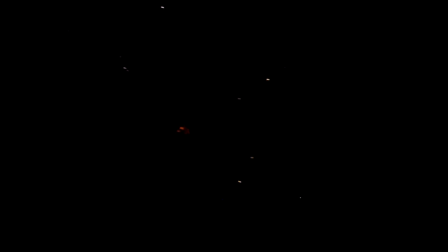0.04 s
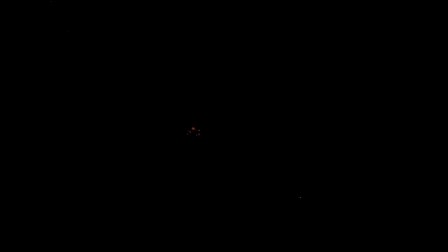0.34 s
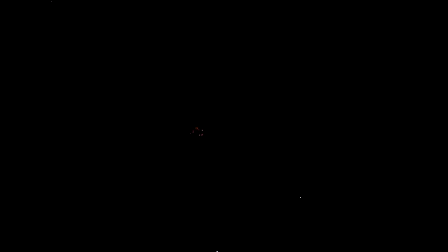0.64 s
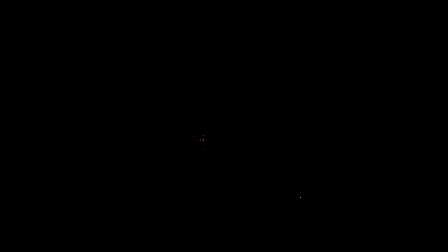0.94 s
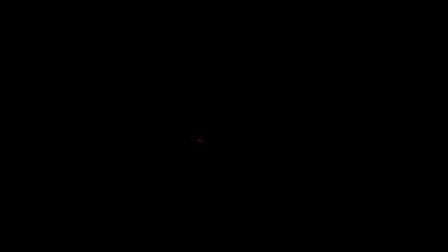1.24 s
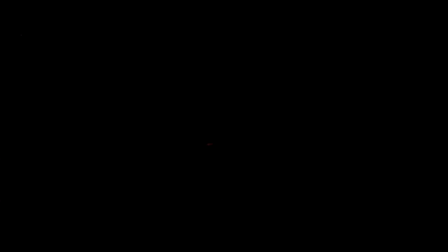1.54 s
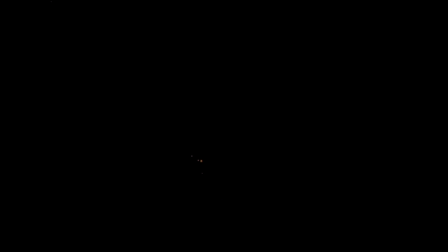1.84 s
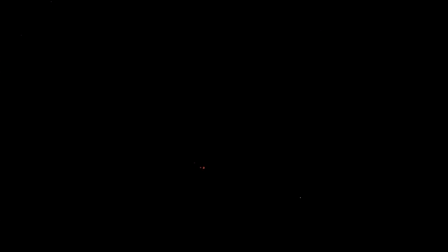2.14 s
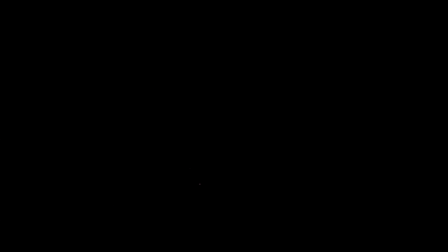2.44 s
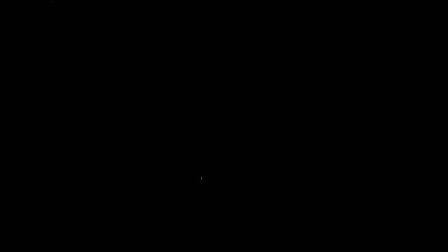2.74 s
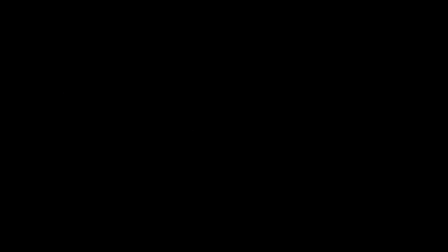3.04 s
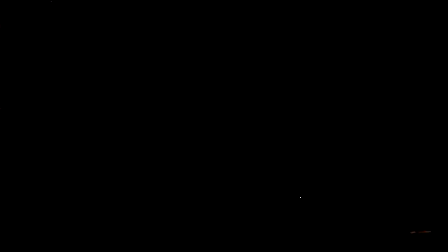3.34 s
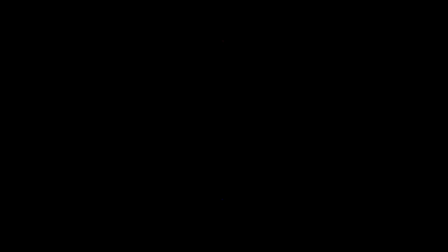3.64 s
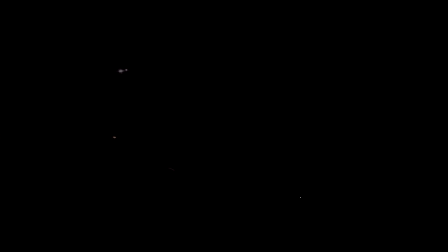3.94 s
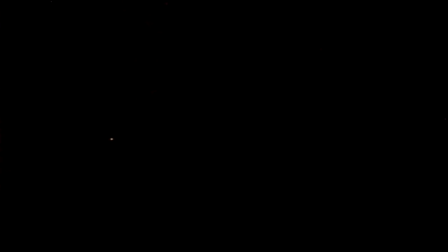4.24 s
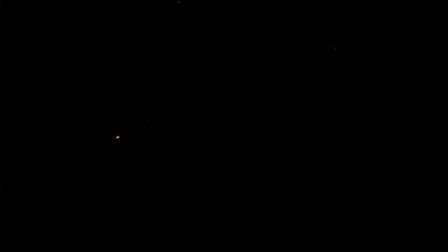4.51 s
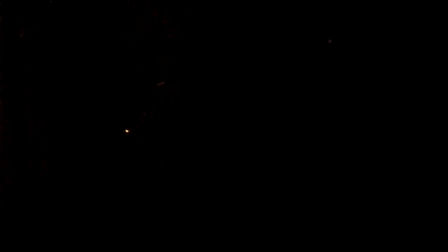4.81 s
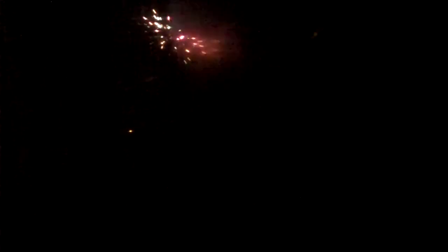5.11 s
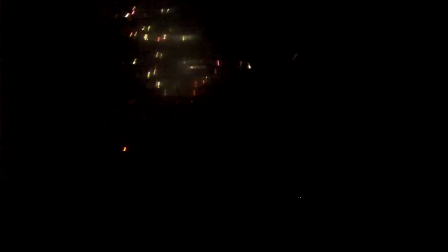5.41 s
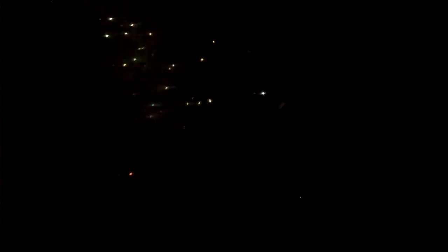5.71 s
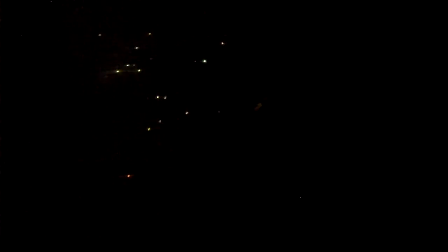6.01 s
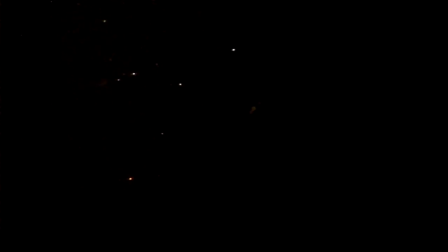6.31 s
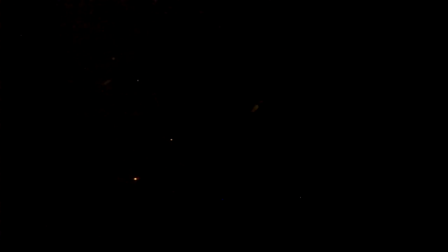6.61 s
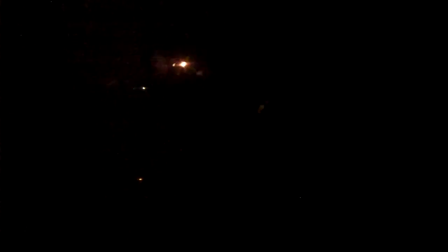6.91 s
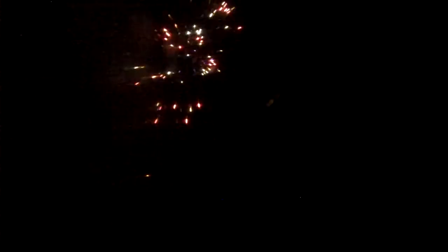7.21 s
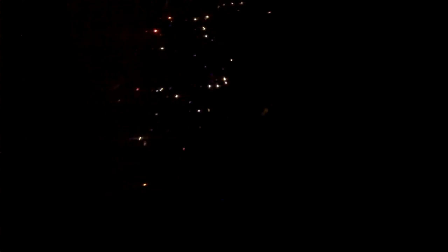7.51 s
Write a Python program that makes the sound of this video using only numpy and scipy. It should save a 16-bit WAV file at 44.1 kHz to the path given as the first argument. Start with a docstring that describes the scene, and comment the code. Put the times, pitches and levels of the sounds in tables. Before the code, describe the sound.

Fireworks go off at night, heard from between houses. Dull launch thuds roll in from a distance and a small cracker snaps brightly. A very loud, dry double crack follows, overloading the small microphone. Then shells burst overhead, first in quick succession, then louder and farther apart, each echoing off the house fronts. Faint far pops and barely audible rocket whistles sit over a quiet rumble and hiss.

```python
"""Fireworks at night, heard from between houses: dull thuds farther off, then sharp bursts overhead.
Each bang is a jump in air pressure that rebounds from the ground, bounces between house fronts and
rolls away over the neighbourhood. A small cracker snaps and faint rockets whistle in the distance,
over a low rumble and hiss. The loudest bangs overload the small microphone."""
import sys
import numpy as np
from scipy import signal
from scipy.fft import rfft, irfft, next_fast_len
from scipy.io import wavfile

SR = 44100
rng = np.random.default_rng(int(sys.argv[2]) if len(sys.argv) > 2 else 0)


def dump_mix(stems):
    """Bounce the given channels to the path in sys.argv[1] as a 16-bit WAV at rate SR."""
    frames = np.atleast_2d(stems).T  # one column per channel
    limited = np.clip(frames, -1, 1)  # hard clip at full scale
    pcm = np.round(limited * 32767).astype(np.int16)
    wavfile.write(sys.argv[1], SR, pcm)


N = 333396


def from_db(db):
    """Turn decibels into a multiplier: 0 dB gives 1, -20 dB gives 0.1."""
    return 10 ** (np.asarray(db) / 20)


def unit_level(x):
    """Scale a sound so that its average level (rms) is 1."""
    return x / np.sqrt(np.mean(x ** 2) + 1e-20)


def keep_band(x, hz, kind, order=2):
    """Keep what is below hz ("low"), above it ("high") or between two values ("band")."""
    sections = signal.butter(order, np.clip(hz, 10, .45 * SR), kind, fs=SR, output="sos")
    return signal.sosfilt(sections, x + 1e-18)


def resonate(x, hz, width_hz):
    """Make a sound ring at one pitch; a narrower width rings longer."""
    r = np.exp(-np.pi * width_hz / SR)
    feedback = [1, -2 * r * np.cos(2 * np.pi * hz / SR), r * r]
    return signal.lfilter(np.array([1, 0, -1]) * (1 - r * r) / 2, feedback, x + 1e-18)


def add(out, start_s, x):
    """Mix x into out from start_s on."""
    i = int(np.clip(round(start_s * SR), 0, len(out)))
    out[i:i + len(x)] += x[:len(out) - i]


def coloured_noise(spectrum):
    """Steady noise with the given balance of low and high pitches."""
    hz, db = np.transpose(spectrum)
    size = next_fast_len(N)
    all_hz = np.fft.rfftfreq(size, 1 / SR)
    gain = from_db(np.interp(np.log(all_hz + 1), np.log(hz), db))
    return unit_level(irfft(rfft(rng.standard_normal(size)) * gain, size)[:N])


# How loud the rumble is over time: time_s, level_db
RUMBLE_LEVELS = [(0, -68), (.75, -68), (2.0, -56.5), (3.9, -61.5), (4.6, -61.5), (7.56, -64)]
# Its balance of low and high: pitch_hz, gain_db
RUMBLE_COLOUR = [(40, -19), (100, -3.5), (200, -5.5), (400, -2.5), (650, 2.5), (1000, -3.5), (1600, -14.5),
                 (3000, -26.5), (8000, -46.5)]
def town_rumble():
    """The town and far displays blur into a rumble that slowly rises and falls."""
    time_s, level_db = np.transpose(RUMBLE_LEVELS)
    return from_db(np.interp(np.arange(N) / SR, time_s, level_db)) * coloured_noise(RUMBLE_COLOUR)


# The hiss's balance of low and high: pitch_hz, gain_db
HISS_COLOUR = [(300, -0.5), (1500, 7), (3000, 8), (6000, 2), (9000, 0.5), (12000, 0), (13500, 0),
               (14500, -37.5)]
def faint_hiss(level_db=-73, fade_in_s=2.14, dip_s=3.27, recovery_s=0.6):
    """A hiss fades in, and dips briefly just after the loudest bang."""
    t = np.arange(N) / SR
    fade_db = -17.5 * (1 - np.minimum(t / fade_in_s, 1) ** 2)
    dip_db = -5 * (t > dip_s) * np.exp(-np.abs(t - dip_s) / recovery_s)
    return from_db(level_db + fade_db + dip_db) * coloured_noise(HISS_COLOUR)


# Soft low swells, puffs of air plus a thump at 3.29 s just after the loudest bang: peak_time_s, level_db,
# half_length_s
LOW_SWELLS = [(1.978, -49.5, 0.24), (3.29, -58, 0.075), (3.835, -50, 0.16), (5.8, -59, .14)]
def breeze(still_db=-70.5, cutoff_hz=10):
    """Slow air pushes on the microphone in soft puffs, and a low thump follows just after the loudest bang."""
    t = np.arange(N) / SR
    puffs = sum(from_db(db) * np.exp(-((t - peak_s) / half_s) ** 2) for peak_s, db, half_s in LOW_SWELLS)
    pressure = unit_level(keep_band(rng.standard_normal(N), cutoff_hz, "low"))
    return (from_db(still_db) + puffs) * pressure


# Pitches that the microphone's case boosts or weakens: pitch_hz, width_hz, gain_db
MIC_RESONANCES = [(201, 7.5, 4), (224, 61, -3.5), (280, 100, 3), (477, 12, 1), (554, 130, 1.5),
                  (671, 160, 3.5), (1203, 200, -1.5), (1400, 300, 2), (1940, 210, -2.5), (2740, 550, -3.5),
                  (4500, 1900, -3.5), (7500, 1000, 3.5)]
def blast_wave(pitch_hz, treble_hz, ring_db, ring_hz=3250, ring_width_hz=600):
    """A pressure jump, then suction. Bigger charges are deeper; air dulls what lies above treble_hz."""
    wave = resonate(signal.unit_impulse(2048), pitch_hz, width_hz=0.56 * pitch_hz)
    wave = keep_band(wave, treble_hz, "low")
    wave = keep_band(wave, 2.49 * treble_hz, "low", order=4)
    wave = keep_band(wave, 180, "high")   # the small microphone loses the bass and adds its own ring
    for hz, width_hz, gain_db in [*MIC_RESONANCES, (ring_hz, ring_width_hz, ring_db)]:
        wave = wave + (from_db(gain_db) - 1) * resonate(wave, hz, width_hz)
    return wave / np.abs(wave).max()


def echo_swarm(wave, t, per_s):
    """Many surfaces send the wave back at random times, a few as strong slaps."""
    arrivals = (rng.random(len(t)) < per_s / SR) * rng.choice([-1, 1], len(t))
    sizes = from_db(5 * np.minimum(rng.exponential(1, len(t)), 3))
    return unit_level(signal.oaconvolve(arrivals * sizes, wave)[:len(t)])


# Rebounds from the ground and roof edges: delay_s, gain_db (added to scatter_db)
REBOUNDS = [(.0038, -5.5), (0.028, -11.5)]
def crack(wave, scatter_db, front_db, fade_s=0.079, round_trip_s=.0387, trip_gain_db=-13.5):
    """The wave itself, its close echoes (scatter_db) and its bounces between house fronts (front_db)."""
    t = np.arange(SR // 4) / SR
    out = np.zeros(len(t))
    fade = from_db(-60 * t / fade_s)
    add(out, 0, wave)
    add(out, .002, from_db(scatter_db - 4) * fade * echo_swarm(wave, t, per_s=4300))
    for delay_s, gain_db in REBOUNDS:
        add(out, delay_s, from_db(scatter_db + gain_db) * wave)
    echo = from_db(-20) * fade * echo_swarm(wave, t, per_s=13000)
    add(echo, 0, wave)
    for trip in range(2):
        echo = keep_band(echo, 2300, "low")   # duller with every trip
        add(out, (trip + 1) * round_trip_s, from_db(front_db + trip * trip_gain_db) * echo)
    return out


# Walls around the listener: delay_s, gain_db
NEAR_WALLS = [(.0052, -19), (0.0128, -13.5), (0.0165, -11)]
def off_nearby_walls(wave):
    """Echoes bounce once more near the listener, which boosts some pitches and weakens others."""
    out = wave.copy()
    for delay_s, gain_db in NEAR_WALLS:
        add(out, delay_s, from_db(gain_db) * wave)
    return out


# Where one band of the street's echo ends and the next begins: pitch_hz
STREET_SPLITS = [350, 1000, 2200, 4500]
# Those bands, from bass to treble: fade_s (time to fall 60 dB), gain_db
STREET_BANDS = [(0.89, 5), (0.83, -0.5), (0.72, 4), (0.73, 3.5), (.42, 3)]
def street_tail(wave, swell_s=.016):
    """Dense echoes from the nearest buildings; the treble dies first."""
    t = np.arange(SR) / SR
    rest, bands = echo_swarm(wave, t, per_s=2400), []
    for hz in STREET_SPLITS:
        bands.append(keep_band(keep_band(rest, hz, "low"), hz, "low"))
        rest = keep_band(keep_band(rest, hz, "high"), hz, "high")
    swell = 1 - np.exp(-t / swell_s)
    fades = [from_db(gain_db - 60 * t / fade_s) for fade_s, gain_db in STREET_BANDS]
    return swell * sum(band * fade for band, fade in zip([*bands, rest], fades))


def far_roll(wave, length_s=2.1, swell_s=.05, fade_s=2.25, treble_hz=2300):
    """Duller echoes set in late, swell and roll away over the neighbourhood."""
    t = np.arange(int(length_s * SR)) / SR
    echoes = keep_band(echo_swarm(wave, t, per_s=3000), treble_hz, "low")
    swell = 1 - np.exp(-(t / swell_s) ** 2)
    return unit_level(echoes) * swell * from_db(-60 * t / fade_s)


def bang(direct, tail, scatter_db, front_db, street_db, roll_db):
    """The direct wave cracks; the tail wave fills the street and rolls away. Each dB sets one echo."""
    scattered = off_nearby_walls(tail)
    out = from_db(roll_db) * far_roll(scattered)
    add(out, 0, from_db(street_db) * street_tail(scattered))
    add(out, 0, crack(direct, scatter_db, front_db))
    return out


# Thuds behind the houses (the one at 1.615 s is the cracker's snap, thrown back by a distant wall): start_s,
# level_db, pitch_hz, treble_hz, scatter_db, street_db, roll_db, tail_pitch_hz
THUDS = [ (0.1721, -44.5, 259, 700, 2.5, -19, -19, 333), (0.7978, -25, 417, 920, -13.5, -31, -22, 795),
         (1.0337, -31, 310, 1290, -2.5, -19, -19.5, 375), (1.6150, -23.5, 487, 1210, -24, -21, -24.5, 720),
         (2.7982, -24, 416, 1150, -10, -15, -20, 830)]
def mortar_thuds():
    """Deep knocks from behind the houses, each with an echo from the house fronts and a long roll. Most are
    launch tubes firing; the one at 1.615 s is the cracker's snap thrown back by a distant wall."""
    out = np.zeros(N)
    for start_s, level_db, pitch_hz, treble_hz, scatter_db, street_db, roll_db, tail_pitch_hz in THUDS:
        direct = blast_wave(pitch_hz, treble_hz, ring_db=-3)
        tail = blast_wave(tail_pitch_hz, treble_hz=1270, ring_db=-3)
        thud = bang(direct, tail, scatter_db, front_db=-8, street_db=street_db, roll_db=roll_db)
        add(out, start_s, from_db(level_db) * thud)
    return out


def in_recess(wave, treble_hz=3500, round_trip_s=0.001446, trip_gain_db=-9.5):
    """Sound bounces to and fro in a narrow gap by the microphone and briefly rings hollow."""
    out, echo = wave.copy(), keep_band(wave, treble_hz, "low", order=1)
    for trip in range(1, 5):
        add(out, trip * round_trip_s, from_db(trip * trip_gain_db) * echo)
    return out


# Snaps of a small cracker: start_s, level_db, pitch_hz, treble_hz, scatter_db, street_db
SNAPS = [(1.5130, -26, 1300, 6100, 1.5, -50), (1.5159, -11, 1280, 3200, -12, -40),
         (1.5249, -15, 1460, 10500, -30, -30.5), (1.5642, -23, 2400, 5400, -17, -39)]
def cracker_snaps():
    """A small charge sounds bright, with a short hissing tail and hardly any roll."""
    out = np.zeros(N)
    tail = blast_wave(pitch_hz=1700, treble_hz=8000, ring_db=-5)
    for start_s, level_db, pitch_hz, treble_hz, scatter_db, street_db in SNAPS:
        direct = in_recess(blast_wave(pitch_hz, treble_hz, ring_db=-5), treble_hz=9000)
        snap = bang(direct, tail, scatter_db, front_db=-30, street_db=street_db, roll_db=-51)
        add(out, start_s, from_db(level_db) * snap)
    return out


# Faint pops of a far display: start_s, level_db, pitch_hz, roll_db
POPS = [(2.1110, -40, 450, -15), (2.2200, -42.5, 580, -27), (2.6305, -41.5, 444, -24.5),
        (3.7332, -33.5, 960, -21.5), (5.0990, -42, 604, -29), (6.5115, -41.5, 453, -16.5),
        (6.6785, -38.5, 793, -19), (6.7765, -37, 898, -29.5), (7.3050, -48, 666, -8),
        (7.3501, -40, 753, -12.5)]
def far_pops():
    """Far bursts, dulled by the air and half lost in their echoes."""
    out = np.zeros(N)
    for start_s, level_db, pitch_hz, roll_db in POPS:
        wave = blast_wave(pitch_hz, treble_hz=860, ring_db=2)
        pop = bang(wave, wave, scatter_db=-5, front_db=-6, street_db=-18.5, roll_db=roll_db)
        add(out, start_s, from_db(level_db) * pop)
    return out


def whistle(length_s, pitches_hz, waver_hz, jet_db):
    """A burning rocket hisses and sounds like an unsteady pipe, gliding through three pitches."""
    burnt = np.minimum(np.arange(SR * 3 // 2) / SR / length_s, 1)   # 0 when lit, 1 when spent
    hz = np.polyval(np.polyfit([0, .5, 1], pitches_hz, 2), burnt)
    thrust = np.abs(np.sin(np.pi * burnt))
    noise = rng.standard_normal(len(hz)) + 1j * rng.standard_normal(len(hz))
    waver = keep_band(noise, waver_hz, "low")   # shakes both loudness and pitch
    phase = 2 * np.pi * np.cumsum(hz) / SR
    tone = unit_level(np.real(waver * np.exp(1j * phase))) * thrust
    jet_band_hz = [0.46 * pitches_hz[1], 0.76 * pitches_hz[1]]
    jet = unit_level(keep_band(rng.standard_normal(len(hz)), jet_band_hz, "band"))
    direct = tone + from_db(jet_db) * jet * np.minimum(10 * thrust, 1)
    out = direct.copy()
    for echo_delay_s in rng.uniform(0.065, 0.18, 4):
        add(out, echo_delay_s, from_db(-11) * direct)
    return out


# Far whistles: start_s, length_s, first_hz, middle_hz, last_hz, level_db, waver_hz, jet_db
WHISTLES = [(2.26, .62, 1850, 2100, 1790, -70.5, 18, -9), (3.80, .66, 5600, 5060, 4980, -72.5, 55, 0),
            (3.69, .74, 5080, 4740, 4560, -77.5, 95, 0)]
def rockets():
    """A low whistle rises and falls, then a high one with two tones sinks."""
    out = np.zeros(N)
    for start_s, length_s, *pitches_hz, level_db, waver_hz, jet_db in WHISTLES:
        add(out, start_s, from_db(level_db) * whistle(length_s, pitches_hz, waver_hz, jet_db))
    return out


# Bangs that arrive as two cracks (the second row is the first thrown back by a far wall 0.1 s later): start_s,
# level_db, pitch_hz, treble_hz, second_db (added to level_db), street_db, roll_db, tail_hz
DOUBLE_BANGS = [(3.2536, 3, 502, 2385, -.5, -32.5, -48.5, 636),
                (3.3536, -10.5, 780, 1310, -4, -27, -35, 1185)]
def double_bangs(gap_s=.0126):
    """A hard, dry crack with a duller one right behind it; a far wall throws the pair back 0.1 s later."""
    out = np.zeros(N)
    for start_s, level_db, pitch_hz, treble_hz, second_db, street_db, roll_db, tail_hz in DOUBLE_BANGS:
        direct = blast_wave(pitch_hz, treble_hz, ring_db=2)
        tail = blast_wave(tail_hz, treble_hz=1650, ring_db=2)
        first = bang(direct, tail, scatter_db=-18.5, front_db=-28.5, street_db=street_db, roll_db=roll_db)
        add(out, start_s, from_db(level_db) * first)
        second = crack(blast_wave(pitch_hz, treble_hz=1420, ring_db=2), scatter_db=-18, front_db=-41.5)
        add(out, start_s + gap_s, from_db(level_db + second_db) * second)
    return out


# Shells bursting overhead:
# start_s, level_db, pitch_hz, treble_hz, scatter_db, front_db, roll_db, tail_treble_hz
BURSTS = [ (3.8580, -29, 920, 2270, -3, -21, -23.5, 3060),
          (4.0933, -17, 1008, 2060, -4.5, -13, -27.5, 2470),
          (4.6320, -16, 940, 2876, -3.5, 4.5, -33.5, 2717), (5.4526, -1, 623, 3855, -6.5, -2, -34, 3200),
          (7.4440, -3, 550, 3540, -5, 0, -25.5, 3330)]
# Distant buildings that throw each burst back: delay_s, gain_db
FAR_WALLS = [(0.1137, -15.5), (.5465, -27.5)]
def shell_bursts():
    """Shells explode overhead, fill the street with echoes and come back dull from distant buildings."""
    out = np.zeros(N)
    for start_s, level_db, pitch_hz, treble_hz, scatter_db, front_db, roll_db, tail_treble_hz in BURSTS:
        direct = in_recess(blast_wave(pitch_hz, treble_hz, ring_db=4.5))
        tail = blast_wave(pitch_hz, tail_treble_hz, ring_db=3.5)
        burst = bang(direct, tail, scatter_db, front_db, street_db=scatter_db - 12, roll_db=roll_db)
        add(out, start_s, from_db(level_db) * burst)
        dull_wave = in_recess(blast_wave(pitch_hz, treble_hz=1050, ring_db=4.5))
        echo = crack(dull_wave, scatter_db=-1.5, front_db=-21)
        for delay_s, gain_db in FAR_WALLS:
            add(out, start_s + delay_s, from_db(level_db + gain_db) * echo)
    return out


def scene():
    """Bangs and rockets over the night air, in one channel."""
    night_air = town_rumble() + faint_hiss() + breeze()
    fireworks = mortar_thuds() + cracker_snaps() + far_pops() + rockets() + double_bangs() + shell_bursts()
    return (night_air + fireworks)[None]


def record(dry, offset=-.0008, cutoff_hz=14200):
    """The microphone sits slightly off zero, flattens the loudest peaks and loses the highest treble."""
    clipped = np.clip(dry + offset, -.98, .98)
    return signal.sosfilt(signal.ellip(8, .2, 70, cutoff_hz, fs=SR, output="sos"), clipped)


dry = scene()
out = record(dry)
dump_mix(out)
```